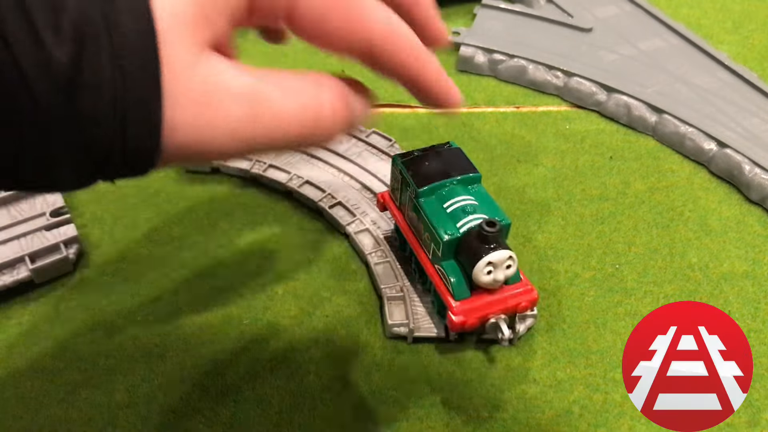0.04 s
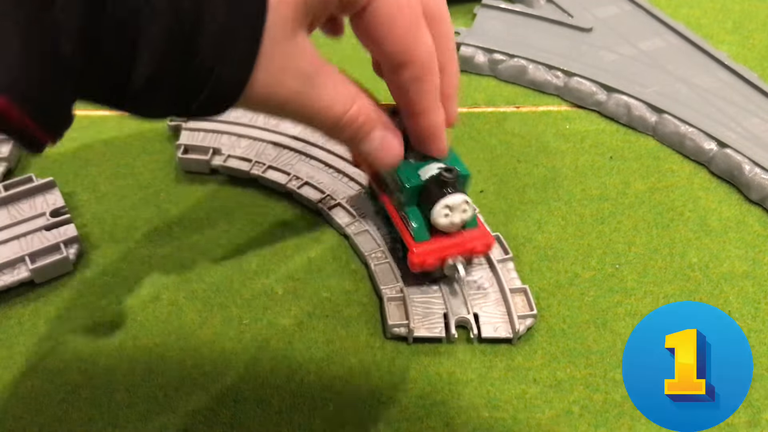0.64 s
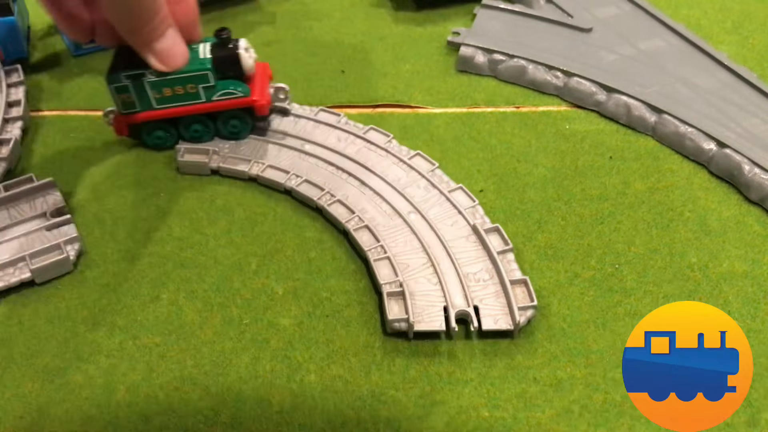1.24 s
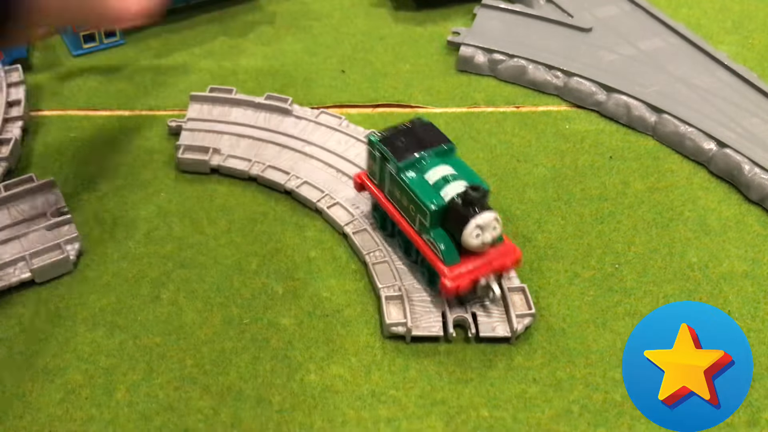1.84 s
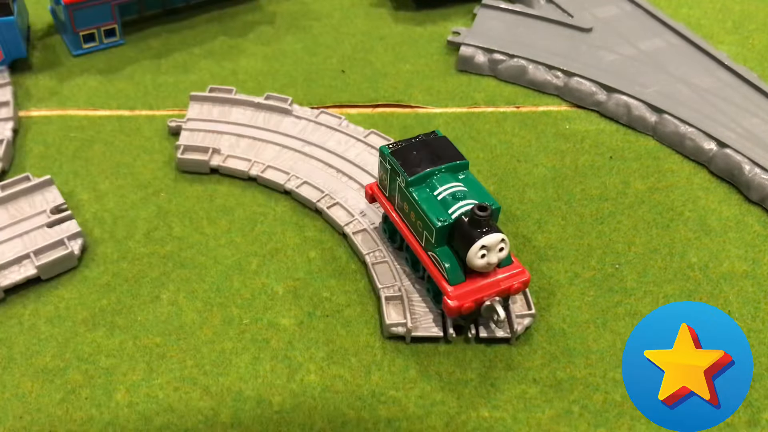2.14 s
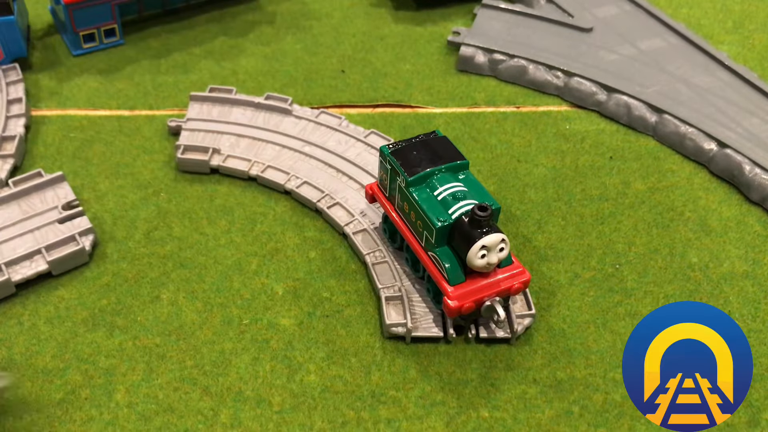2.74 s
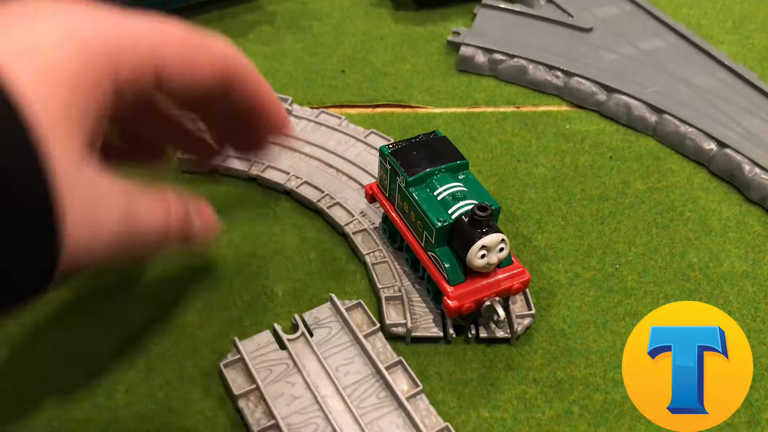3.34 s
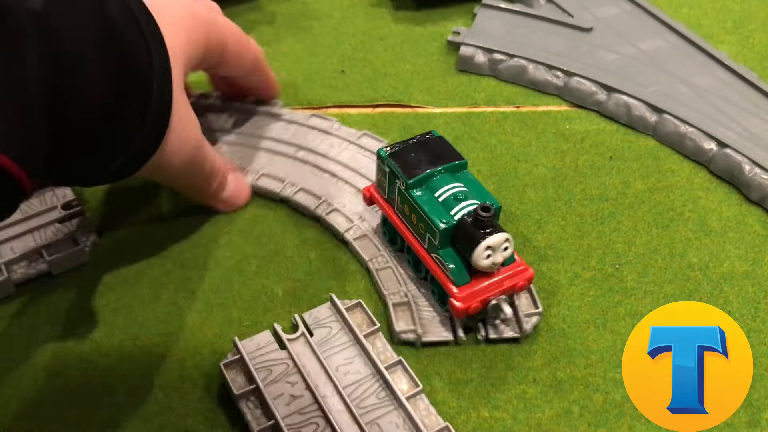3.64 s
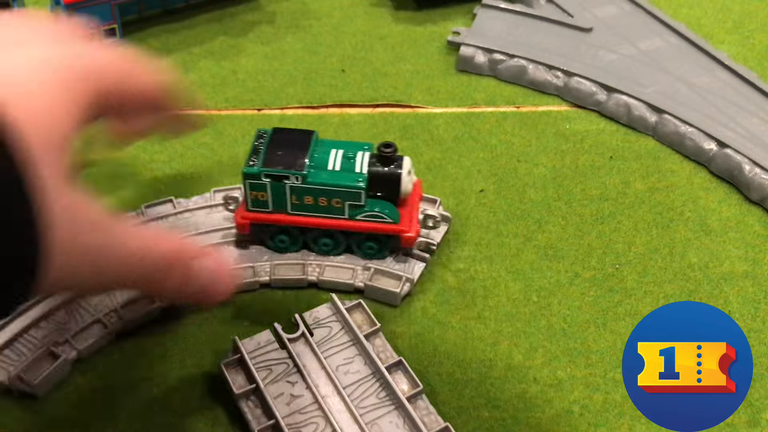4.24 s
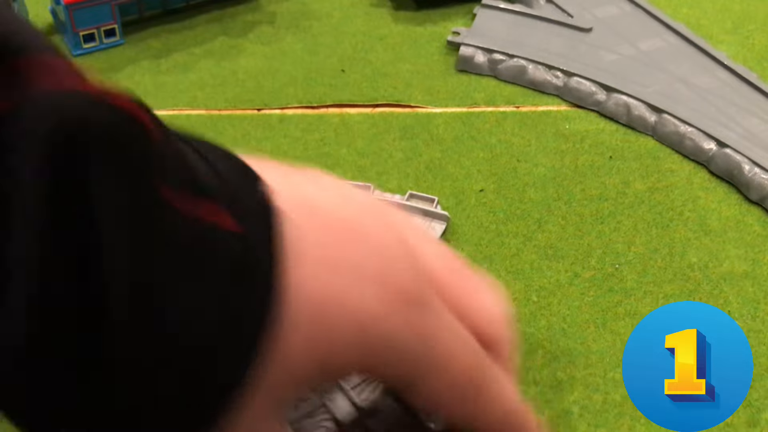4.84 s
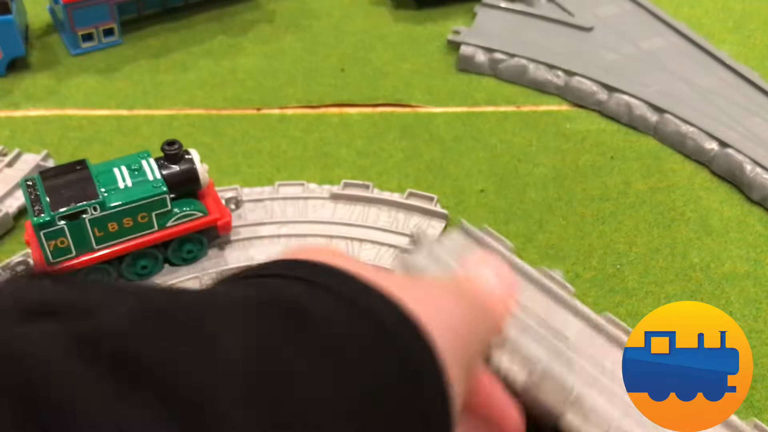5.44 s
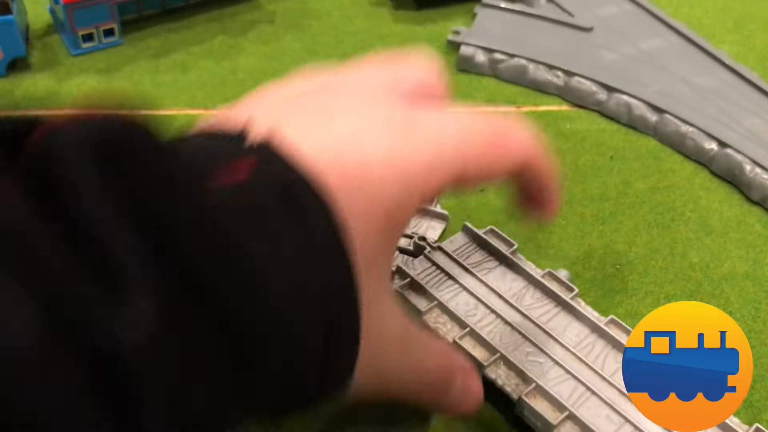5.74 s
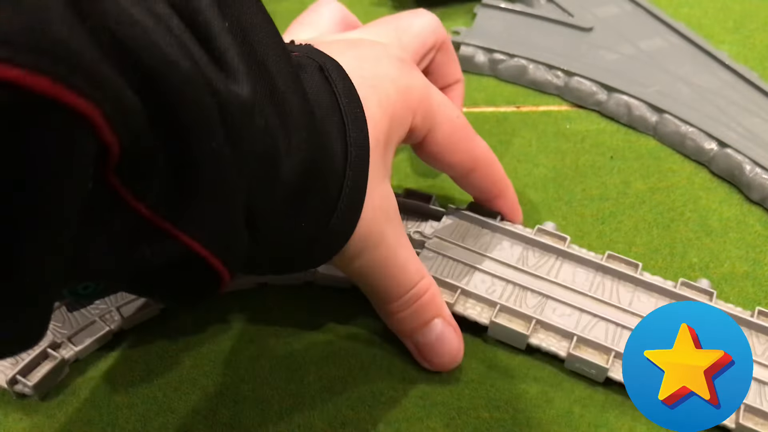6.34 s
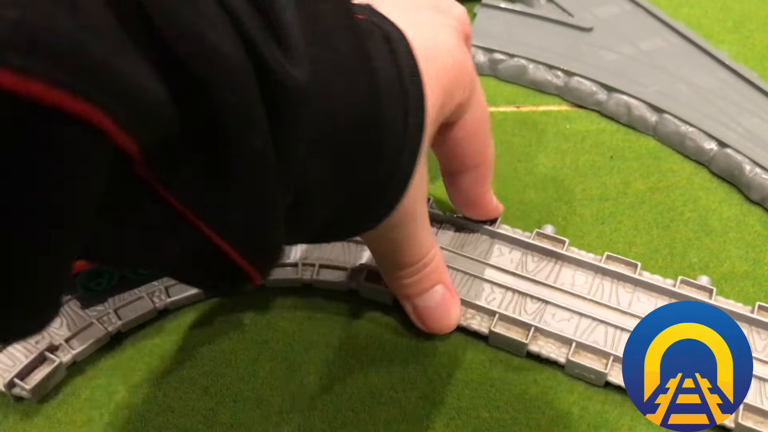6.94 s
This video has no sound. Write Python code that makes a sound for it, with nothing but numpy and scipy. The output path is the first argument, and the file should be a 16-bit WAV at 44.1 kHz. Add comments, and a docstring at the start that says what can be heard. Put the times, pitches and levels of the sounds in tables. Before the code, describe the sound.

A toy train rattles back and forth on plastic track, then track pieces are dragged over felt and clicked together.

```python
"""A toy engine is pushed back and forth on curved plastic track; its loose wheels rattle and clack, and
the felt-covered table rumbles. From 2.1 s something slides with a soft hiss and the track is tapped.
At 3.6 s the track is dragged, hissing over the felt; at 4.4 s the engine rolls once more. After another
short drag, a second piece is set down and clicked on at 5.3 s. A sleeve rustles and light taps follow,
over the faint air and hum of a small, quiet room."""
import sys
import numpy as np
from scipy import signal
from scipy.fft import rfft, irfft
from scipy.io import wavfile
from scipy.ndimage import uniform_filter1d

SR = 44100
rng = np.random.default_rng(int(sys.argv[2]) if len(sys.argv) > 2 else 0)


def to_wav(s):
    """Save 16-bit WAV."""
    ch = np.atleast_2d(s).T  # columns
    pcm = np.round(np.clip(ch, -1, 1) * 32767)  # PCM
    wavfile.write(sys.argv[1], SR, pcm.astype(np.int16))


N = 312624
TIME_S = np.arange(N) / SR

# hand shoves: (full-speed time [s], attack [s], hold [s], release [s], rattle [dB], rumble [dB])
ENGINE_SHOVES = [(0.24, 0.044, 0.021, 0.27, -33, -43.5), (0.39, 0.067, 0.013, .12, -30, -39),
                 (0.666, .05, .025, .18, -24.5, -35.5), (0.815, 0.082, 0.038, 0.23, -22, -32),
                 (0.964, 0.13, .08, 0.27, -31, -34), (1.209, 0.25, 0.021, .07, -29.5, -36),
                 (1.482, .22, 0.063, 0.25, -22, -36), (1.689, 0.07, 0.048, 0.23, -27, -40),
                 (4.419, 0.086, 0.096, 0.14, -23, -33)]
# wheels and couplings on the rails: (time [s], level [dB], treble re level [dB], t60 [s], spot [Hz])
WHEEL_CLACKS = [(0.1513, -38.5, -1.5, 0.071, 3160), (0.2167, -28.5, -17, 0.024, 2260),
                (0.2392, -30, -8, .016, 2300), (0.3462, -25.5, -12, .011, 4270),
                (0.3878, -16, -7.5, .028, 3580), (0.498, -34.5, -12, 0.013, 2400),
                (0.5794, -28, -11, 0.027, 2430), (0.6684, -13, -11, .015, 2280),
                (0.6874, -19, -5, .038, 4070), (0.7942, -18, -3.5, .027, 3650),
                (0.8134, -16, 3, .0075, 4098), (0.8456, -16.5, -11, 0.0043, 3800),
                (0.858, -14.5, -9.5, .018, 2993), (0.8812, -21.5, -7, .005, 2241),
                (0.9064, -14.5, -4, .018, 4430), (0.927, -21, -6, .015, 1860), (0.9511, -22, -6, .01, 2428),
                (1.0329, -21, -13, .016, 2400), (1.111, -18, -13.5, .008, 2310),
                (1.2185, -23.5, -1, .053, 2340), (1.3451, -22, -12.5, .02, 4000),
                (1.4861, -16, -20, .011, 4285), (1.5041, -10.5, -10.5, .02, 3243),
                (1.5498, -17.5, -24, .029, 4230), (1.6076, -21, -10, .003, 4400),
                (1.6656, -17.5, -7.5, .003, 4607), (1.6737, -19.5, -6.5, .045, 2753),
                (4.0552, -26.5, -3.5, .011, 4240), (4.1481, -30.5, -5.5, .04, 3520),
                (4.317, -38, -13, .022, 1920), (4.3584, -25.5, -2.5, .06, 3798),
                (4.3742, -18, -3, .045, 2600), (4.4596, -13.5, -12, 0.0098, 2810),
                (4.515, -17, -24, 0.0066, 2960), (4.561, -13, -25, 0.013, 3620),
                (4.6729, -32.5, -7, 0.011, 3170), (4.6869, -29.5, -10, 0.0044, 3740)]
# engine contact spectrum: (frequency [Hz], level [dB])
ENGINE_SPECTRUM = [(400, -14.5), (750, -17.5), (1200, -11.5), (1800, -1.5), (2500, 2), (4200, 0),
                   (4900, -5), (5600, -3), (7600, -12.5), (8600, -9), (10200, -18), (14000, -14),
                   (16000, -20.5)]
# engine on its rails: (frequency [Hz], level [dB], t60 [s])
ENGINE_RESONANCES = [(1920, 0.5, .04), (2180, -8, .035), (2410, 0, 0.055), (2590, -3.5, .035),
                     (2900, -7, 0.046), (3055, -6.5, 0.018), (3265, 3, 0.023), (3780, -4, 0.05),
                     (4125, 7.5, 0.032), (5467, 6, .035), (8600, 4.5, 0.03), (14200, 4, .03)]
# table under the rolling wheels: (frequency [Hz], level [dB])
RUMBLE_SPECTRUM = [(30, -30.5), (60, -0.5), (100, 3.5), (170, -0.5), (300, -1.5), (450, -11), (700, -19),
                   (1400, -23)]


def engine(rattle_trim_db=-1, clack_trim_db=1.5, rumble_trim_db=-1, ring_db=-18):
    """Loose wheels tick over ribbed track, faster when pushed harder, and clack; the table rumbles."""
    push, rumble_gain = np.zeros(N), np.zeros(N)
    for s, attack_s, hold_s, release_s, rattle_db, rumble_db in ENGINE_SHOVES:
        speed = stroke(s, attack_s, hold_s, release_s)
        push = np.maximum(push, undb(rattle_db) * speed)
        rumble_gain = np.maximum(rumble_gain, undb(rumble_db) * speed ** 0.54)
    ticks_per_s = 200 + 600 * np.sqrt(push / push.max())
    ticks = pings(ticks_per_s, low_hz=1300, high_hz=11230, t60_s=0.0059, rasp=1.77, spread_db=2)
    out = undb(rattle_trim_db) * push * unit(colour(ticks, ENGINE_SPECTRUM))
    out += undb(ring_db) * ring(out, ENGINE_RESONANCES)
    rumble = rumble_gain * unit(colour(grains(per_s=400, spread_db=5.5), RUMBLE_SPECTRUM))
    for s, db, treble_db, t60_s, spot_hz in WHEEL_CLACKS + jolts(push):
        clack = impact(ENGINE_SPECTRUM, ENGINE_RESONANCES, t60_s, spot_hz, db + clack_trim_db, treble_db,
                       low_db=-19, ring_db=-10, snap=1.2, spot_gain=2.65, spot_q=13)
        add(out, s, clack)
    return out + undb(rumble_trim_db) * rumble


def jolts(push, max_per_s=40, over_push_db=2, treble_db=-10, t60_s=0.01, low_hz=1900, high_hz=5400):
    """Rows of lesser random clacks: the faster the wheels, the more and the louder."""
    onsets = np.flatnonzero(rng.random(N) < max_per_s * np.sqrt(push / push.max()) / SR)
    spots_hz = low_hz * (high_hz / low_hz) ** rng.random(len(onsets))
    return [(i / SR, 20 * np.log10(push[i]) + over_push_db, treble_db, t60_s, hz)
            for i, hz in zip(onsets, spots_hz)]


# pieces tapped, set down and clicked together:
# (time [s], level [dB], treble re level [dB], t60 [s], spot [Hz], table thud [dB], thud pitch [Hz])
TRACK_KNOCKS = [(2.1171, -29, -13, .011, 1840, -47, 100), (2.608, -25.5, -10, 0.014, 1900, -30.5, 152),
                (2.6255, -29, -19, 0.0099, 1600, -49, 60), (3.1162, -26.5, -0.5, 0.034, 3150, -22.5, 238),
                (3.1435, -31, -5, .008, 2800, -30.5, 130), (3.18, -23.5, -2.5, 0.032, 2600, -29, 169),
                (3.564, -32.5, -1, 0.011, 1444, -29.5, 101), (3.786, -22.5, -3, 0.02, 1110, -20.5, 350),
                (3.87, -26, -20, .012, 2240, -53, 130), (4.892, -30, -22, 0.051, 1900, -26.5, 124),
                (4.9707, -24.5, 1, 0.0064, 1220, -27, 182), (4.997, -28, 0.5, 0.011, 1450, -24, 159),
                (5.0856, -32.5, -7, 0.0098, 1090, -28.5, 260), (5.2875, -12.5, -5, 0.02, 1570, -25, 417),
                (5.291, -8.5, -5.5, 0.028, 2940, -43, 300), (5.3865, -29.5, 8.5, .025, 1300, -6.5, 302),
                (5.462, -10.5, 2, 0.0067, 5550, -29, 200), (5.4686, -16.5, -10, 0.013, 1750, -26.5, 99),
                (6.2213, -33.5, -17, 0.013, 3080, -42, 130), (6.247, -35, 2.5, 0.015, 1890, -45, 130),
                (6.2628, -31.5, -18, 0.013, 2820, -49, 130), (6.4949, -28.5, -11, 0.041, 2320, -34.5, 130),
                (6.629, -37.5, -8, .02, 4440, -54, 130), (6.921, -38.5, 0, 0.011, 900, -20.5, 345)]
# track contact spectrum: (frequency [Hz], level [dB])
TRACK_SPECTRUM = [(200, -7.5), (500, -5), (740, -13), (980, -3), (1250, -5.5), (1800, -0.5), (3100, -1),
                  (4800, -6.5), (5800, -2.5), (8000, -13.5), (10200, -14.5), (12000, -17), (16000, -10)]
# bare track piece: (frequency [Hz], level [dB], t60 [s])
TRACK_RESONANCES = [(976, 3, 0.052), (1486, -3, 0.039), (1805, -11, 0.06), (1883, 3.5, 0.045),
                    (2510, -14.5, 0.072), (2460, -5, 0.068), (2700, -5, .045), (2920, -2, 0.032),
                    (3097, -11.5, 0.048), (3660, 5, .06), (4063, 4.5, 0.043), (5490, -19, .04),
                    (5630, -12.5, .04)]


def track(trim_db=-1, bounce_above_db=-20, bounce_gap_s=0.019, bounce_step_db=-15.5):
    """Hollow plastic pieces knock together and ring briefly; a hard knock bounces twice."""
    out = np.zeros(N)
    for s, db, treble_db, t60_s, spot_hz, _, _ in TRACK_KNOCKS:
        hollow_db = -8 * np.log2(spot_hz / 1190)  # lower spot, more lows
        for bounce in range(3 if db > bounce_above_db else 1):
            hit_db = db + trim_db + bounce * bounce_step_db
            knock = impact(TRACK_SPECTRUM, TRACK_RESONANCES, t60_s, spot_hz, hit_db, treble_db,
                           low_db=hollow_db, ring_db=-12.5, snap=1.5, spot_gain=1.96, spot_q=4.1)
            add(out, s + bounce * bounce_gap_s, knock)
    return out


# hand pressing on the table: (time [s], peak [dB], pitch [Hz])
HAND_PRESSES = [(0.966, -31, 119), (1.014, -35, 120), (2.099, -40, 99), (4.853, -30.5, 83.5)]
# table top: (frequency [Hz], level [dB], t60 [s])
TABLE_RESONANCES = [(59.3, 14, 0.22), (80, 7, 0.078), (119, -6, 0.16), (207, -4, 0.11), (304, -8.5, 0.071),
                    (456, -18, 0.069)]


def table_thuds(trim_db=-3, lag_s=0.00508):
    """The table top yields to each press or track knock and springs back; its low modes ring on."""
    flex = np.zeros(N)
    t = TIME_S[:SR // 10] - 0.05
    thuds = [(s + lag_s, db, hz) for s, *_, db, hz in TRACK_KNOCKS]
    for s, db, hz in HAND_PRESSES + thuds:
        phase = 2 * np.pi * hz * t
        add(flex, s + t[0], -undb(db) * phase * np.exp((1 - phase ** 2) / 2))
    ringing = sum(undb(db) * resonate(flex, hz, q=np.pi * hz * t60_s / np.log(1000))
                  for hz, db, t60_s in TABLE_RESONANCES)
    return undb(trim_db) * (flex + ringing)


# short low throbs, groans and rasps: (centre time [s], level [dB], length [s], pitch [Hz])
THROBS_AND_GROANS = [(1.009, -32, 0.096, 107.6), (1.746, -37, 0.067, 330), (2.587, -41, 0.066, 230),
                     (3.768, -39.5, 0.027, 377), (4.201, -41, 0.06, 336), (6.133, -48, 0.13, 4230)]


def throbs_and_groans():
    """Short, roughly pitched swells: first a throb of the table, then groans and a rasp."""
    out = np.zeros(N)
    for s, db, length_s, hz in THROBS_AND_GROANS:
        noise = unit(band(rng.standard_normal(N), [hz * 0.7, hz * 1.34], "band", order=2))
        out += undb(db) * noise * np.exp(-(2 * (TIME_S - s) / length_s) ** 2)
    return out


# track pulled over felt: (full-speed time [s], attack [s], hold [s], level [dB])
TRACK_DRAGS = [(3.641, 0.098, 0.47, -32.5), (4.834, 0.011, 0.097, -30)]
# felt friction: (frequency [Hz], level [dB])
FELT_SPECTRUM = [(100, -2.5), (330, -4.5), (520, -10), (780, -22), (1000, -6.5), (1350, -9), (1900, -1),
                 (4300, 5), (7000, 2), (10300, -2.5), (16000, 0.5)]


def drag(chirp_db=-12):
    """Track edges comb the felt in a dense hiss and catch with small plastic chirps."""
    fibres = unit(colour(grains(per_s=20000, spread_db=5), FELT_SPECTRUM))
    hiss = flutter(fibres, depth_db=1.8, rate_hz=69)
    chirps = unit(pings(per_s=45, low_hz=1690, high_hz=2962, t60_s=0.026, rasp=0.14, spread_db=2.5))
    gain = sum(undb(db) * stroke(s, attack_s, hold_s, release_s=0.15, sag_db=2.5)
               for s, attack_s, hold_s, db in TRACK_DRAGS)
    return gain * (hiss + undb(chirp_db) * chirps)


# soft sliding, brushing strokes: (full-speed time [s], hold [s], swish [dB], hiss [dB])
BRUSH_STROKES = [(2.108, 0.16, -42.5, -42), (2.287, 0.13, -47.5, -47.5), (2.481, .07, -51.5, -46),
                 (2.56, 0.11, -41.5, -40.5), (5.053, 0.15, -52, -48), (5.252, 0.34, -45.5, -48.5),
                 (5.771, 0.0068, -51, -68), (5.967, 0.095, -43.5, -44.5), (6.114, 0.21, -44, -51.5),
                 (6.422, 0.1, -48.5, -51.5), (6.567, 0.056, -45, -44.5), (6.77, 0.048, -41.5, -46),
                 (6.87, .09, -45.5, -44.5)]
# swish: (frequency [Hz], level [dB])
SWISH_SPECTRUM = [(200, -1.5), (700, -11.5), (2000, -7.5), (4200, 1), (5200, -0.5), (6500, 0), (9000, -18),
                  (16000, -28)]
# fine hiss: (frequency [Hz], level [dB])
HISS_SPECTRUM = [(2000, -6), (6000, -4), (9000, 2.5), (10400, -1.5), (12500, 2), (16000, -5.5)]


def brushing(trim_db=-1):
    """Soft sliding, brushing strokes: dense tiny slips make an uneven swish and a fine hiss."""
    swish_gain, hiss_gain = np.zeros(N), np.zeros(N)
    for s, hold_s, swish_db, hiss_db in BRUSH_STROKES:
        speed = stroke(s, attack_s=0.047, hold_s=hold_s, release_s=0.07, sag_db=2)
        swish_gain = np.maximum(swish_gain, undb(swish_db) * speed)
        hiss_gain = np.maximum(hiss_gain, undb(hiss_db) * speed)
    swish = swish_gain * unit(colour(grains(per_s=3000, spread_db=2.5), SWISH_SPECTRUM))
    hiss = hiss_gain * unit(colour(grains(per_s=11000, spread_db=2.5), HISS_SPECTRUM))
    return undb(trim_db) * flutter(swish + hiss, depth_db=1.67, rate_hz=71)


def room(x, wet_db=-13, low_t60_s=0.28, high_t60_s=0.16, onset_s=0.0056):
    """Close walls add a short tail whose treble dies first."""
    t = TIME_S[:SR // 2]
    noise = rng.standard_normal(len(t))
    lows = band(noise, 6600, "low", order=1) * fade(t, low_t60_s)
    highs = band(noise, 4100, "high", order=1) * fade(t, high_t60_s)
    tail = (lows + 0.35 * highs) * (1 - np.exp(-(t / onset_s) ** 2))
    return x + undb(wet_db) * through(x, tail / np.linalg.norm(tail))


# room air: (frequency [Hz], level [dB])
AIR_SPECTRUM = [(15, -61.5), (25, -34), (42, -7.5), (64, -3), (92, -14.5), (185, -15.5), (212, -14.5),
                (384, -19.5), (463, -27), (607, -24), (1020, -24.5), (1560, -29.5), (1700, -32.5),
                (2000, -29.5), (16000, -37.5)]
# low hum: (time [s], level [dB])
HUM_LEVELS = [(0, -60), (3.4, -54), (4.6, -59), (5.7, -48.5), (6.7, -59), (7.09, -62)]


def background(air_db=-52.5, hum_hz=54.5):
    """Faint room air and a low hum that wavers in pitch and level."""
    air = unit(colour(rng.standard_normal(N), AIR_SPECTRUM)) * undb(air_db + 0.5 * wander(2.7))
    pitch_hz = hum_hz + 2.5 * wander(19)
    hum = np.sqrt(2) * np.sin(2 * np.pi * np.cumsum(pitch_hz) / SR)
    hum_db = np.interp(TIME_S, *np.transpose(HUM_LEVELS)) + 1.7 * wander(8)
    return air + undb(hum_db) * hum


def impact(spectrum, modes, t60_s, spot_hz, db, treble_db, low_db, ring_db, snap, spot_gain, spot_q):
    """A hard contact and its dying chatter: the struck spot rings briefly, the whole body longer."""
    t = TIME_S[:SR // 6]
    build_up = 1 - np.exp(-t / (0.014 * t60_s))
    chatter = rng.standard_normal(len(t)) * fade(t, t60_s) * build_up
    chatter[0] += snap
    contact = colour(chatter, spectrum, size=2048)
    spot = spot_gain * resonate(contact, spot_hz, spot_q)
    body = undb(ring_db) * ring(contact, modes, uneven_db=1, detune=0.013)
    hit = contact + spot + body
    parts = band(hit, 1500, "low"), band(hit, [1500, 7000], "band"), band(hit, 7000, "high")
    # band levels hold for the first 5 ms
    return sum(undb(db + part_db) * part / np.sqrt(np.mean(part[:SR // 200] ** 2))
               for part, part_db in zip(parts, (low_db, 0, treble_db)))


def ring(x, modes, uneven_db=4, detune=0.012):
    """Ringing that x leaves in a body; each contact point favours other modes."""
    t = TIME_S[:SR // 6]
    response = np.zeros(len(t))
    for hz, db, t60_s in modes:
        strength, shift, phase = rng.standard_normal(3)
        tone = np.sin(2 * np.pi * (hz * (1 + detune * shift) * t + phase))
        response += undb(db + uneven_db * strength) * fade(t, t60_s) * tone
    return through(x, response / np.linalg.norm(response))


def pings(per_s, low_hz, high_hz, t60_s, rasp, spread_db):
    """Tiny random contacts, each a tone and a shorter rasp; power evened over 25 ms."""
    out, t = np.zeros(N), TIME_S[:SR // 25]
    onsets_s = TIME_S[rng.random(N) < per_s / SR]
    for s in onsets_s:
        place, size, length = rng.random(3)
        hz = low_hz * (high_hz / low_hz) ** place
        decay_s = t60_s * (0.5 + length)
        tone = np.sin(2 * np.pi * hz * t) * fade(t, decay_s)
        noise = rasp * rng.standard_normal(len(t)) * fade(t, decay_s / 2)
        add(out, s, (1 - size) ** (-spread_db / 10) * (tone + noise))
    power = np.abs(uniform_filter1d(out ** 2, size=1102))
    return out / np.sqrt(power + np.mean(out ** 2) / 20)


def grains(per_s, spread_db):
    """Random impulses of uneven size; power evened over 30 ms."""
    clicks = (rng.random(N) < per_s / SR) * rng.choice([-1, 1], N)
    clicks = clicks * undb(spread_db * rng.standard_normal(N))
    power = np.abs(uniform_filter1d(clicks ** 2, size=1323))
    return clicks / np.sqrt(power + 1e-9)


def stroke(s, attack_s, hold_s, release_s, sag_db=0, depth_db=30):
    """Gain of a movement: speeds up until s, holds or sags, runs out."""
    early = np.maximum(s - TIME_S, 0) / attack_s
    late = np.maximum(TIME_S - s - hold_s, 0) / release_s
    held = np.clip((TIME_S - s) / hold_s, 0, 1)
    return undb(np.maximum(-depth_db * (early + late) - sag_db * held, -120))


def flutter(x, depth_db, rate_hz):
    """Lows, mids and highs waver separately around a shared waver."""
    low, high = band(x, 2500, "low", order=1), band(x, 6900, "high", order=1)
    shared = undb(depth_db * wander(rate_hz))
    return shared * sum(part * undb(depth_db * wander(rate_hz)) for part in (low, x - low - high, high))


def wander(rate_hz):
    """Smooth random drift, rms 1."""
    step = int(SR / rate_hz)
    stairs = np.repeat(rng.standard_normal(N // step + 1), step)
    return unit(uniform_filter1d(stairs, step)[:N])


def colour(x, spectrum, size=8192):
    """Minimum-phase filter from (frequency [Hz], level [dB]) rows."""
    hz, db = np.transpose(spectrum)
    bins_hz = np.maximum(np.fft.rfftfreq(size, 1 / SR), 1)
    gain = undb(np.interp(np.log(bins_hz), np.log(hz), db))
    cepstrum = irfft(np.log(gain))
    cepstrum[1:size // 2] *= 2
    cepstrum[size // 2 + 1:] = 0
    return through(x, irfft(np.exp(rfft(cepstrum)))[:size // 2])


def resonate(x, hz, q):
    """Single resonance."""
    return signal.lfilter(*signal.iirpeak(hz, q, fs=SR), x)


def band(x, hz, kind, order=3):
    """Butterworth filter."""
    return signal.sosfilt(signal.butter(order, hz, kind, fs=SR, output="sos"), x)


def through(x, response):
    """Convolve, keeping the length."""
    return signal.fftconvolve(x, response)[:len(x)]


def fade(t, t60_s):
    """Exponential decay, 60 dB down at t60_s."""
    return np.exp(-np.log(1000) * t / t60_s)


def add(out, s, sound):
    """Mix a sound in at time s."""
    i = max(int(s * SR), 0)
    out[i:i + len(sound)] += sound[:max(N - i, 0)]


def undb(db):
    """Decibels to gain."""
    return 10 ** (np.asarray(db) / 20)


def unit(x):
    """Scale to rms 1."""
    return x / np.sqrt(np.mean(x ** 2))


def scene():
    """Everything on the table, heard in the room; mono."""
    sources = engine() + track() + table_thuds() + throbs_and_groans() + drag() + brushing()
    return (room(sources) + background())[None]


def record(dry, bottom_hz=38, top_hz=15950):
    """The microphone drops the deepest bass, clips at full scale and cuts the top."""
    clipped = np.clip(band(dry, bottom_hz, "high"), -1, 1)
    return signal.sosfilt(signal.ellip(12, 0.2, 70, top_hz, fs=SR, output="sos"), clipped)


dry = scene()
out = record(dry)
to_wav(out)
```